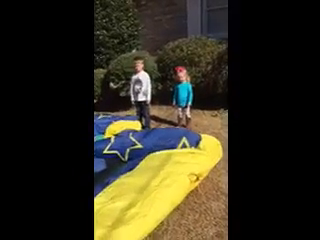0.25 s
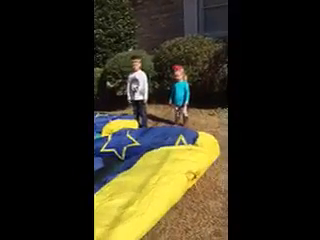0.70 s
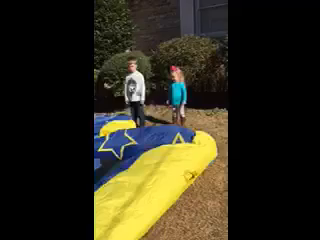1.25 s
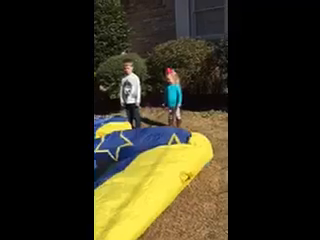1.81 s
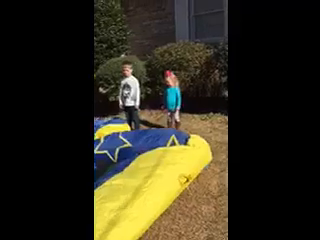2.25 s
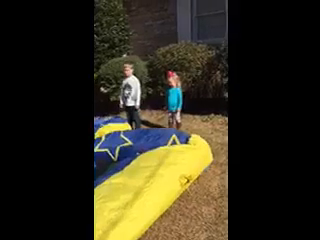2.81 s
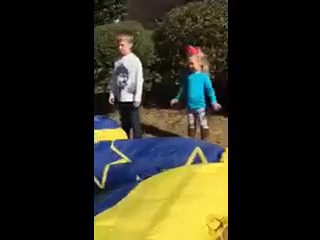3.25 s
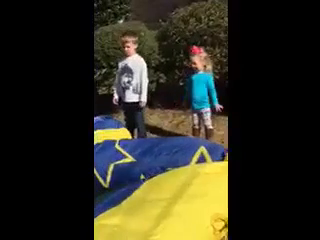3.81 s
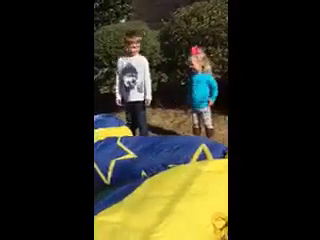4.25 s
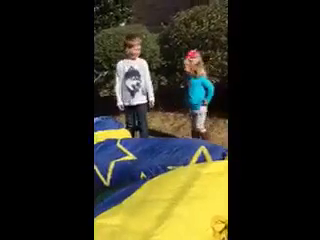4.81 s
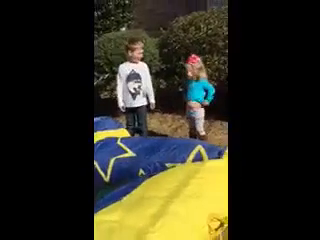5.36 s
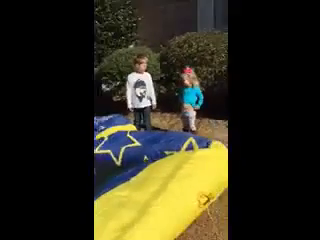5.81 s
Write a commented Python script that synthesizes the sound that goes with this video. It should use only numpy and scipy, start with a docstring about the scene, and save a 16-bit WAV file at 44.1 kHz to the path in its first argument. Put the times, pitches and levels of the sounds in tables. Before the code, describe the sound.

An electric blower runs steadily outdoors, filling a large inflatable with a low roar, rushing air and a thin whine.

```python
"""A steady roar of air on a lawn: an electric blower fills a large inflatable, a few metres from a phone.
Turbulent air rumbles in the fill tube and rushes through the fan, surging as eddies meet the impeller.
The blades add a thin whine that sinks slightly in pitch;
its partials swell and fade as the listener moves."""
import sys
import numpy as np
from scipy import signal
from scipy.fft import rfft, irfft, next_fast_len
from scipy.io import wavfile
from scipy.ndimage import uniform_filter1d, map_coordinates

SR = 44100
rng = np.random.default_rng(int(sys.argv[2]) if len(sys.argv) > 2 else 0)


def unload_audio(sound):
    """Save the sound as a 16-bit wav file, at the path given as the first command line argument."""
    columns = np.transpose(np.atleast_2d(sound))
    # keep every value between -1 and 1, then stretch to whole-number steps
    steps = np.round(np.clip(columns, -1, 1) * 32767)
    wavfile.write(sys.argv[1], SR, steps.astype(np.int16))


N = 267246

# the impeller slowing slightly: (time [s], blade passing rate [Hz])
BLADE_RATE = [(0, 325.8), (1, 325.0), (2.4, 323.6), (4, 322.85), (6.06, 322.8)]
# blade tones whose levels change over time at the microphone: (time [s], 2nd harmonic [dB], 4th [dB], 6th [dB])
CHANGING_TONES = [(0, -44, -51, -51), (.55, -50.5, -57, -47), (.95, -57, -54.5, -51.5),
                  (1.8, -53, -46.5, -43.5), (2.6, -58, -49.5, -46.5), (3.55, -51.5, -49, -49.5),
                  (4.0, -51.5, -49, -45.5), (4.75, -53, -42.5, -45.5), (5.2, -52.5, -50, -53),
                  (6.06, -46.5, -46, -49)]
# further blade tones, each at a steady level: (harmonic number, level [dB])
STEADY_TONES = [(1, -49.5), (3, -58), (8, -69)]
# air in the fill tube: (frequency [Hz], relative level [dB])
TUBE_SPECTRUM = [(8, -37), (24, -14), (50, -10.5), (85, -8), (125, -2), (185, 0), (225, -1.5), (290, -9),
                 (600, -72)]
# the hollow of the fan housing: (frequency [Hz], relative level [dB])
HOUSING_SPECTRUM = [(130, -31.5), (225, -4.5), (285, 3.5), (335, 3.5), (390, -1), (450, -6), (900, -72)]
# air leaving the outlet: (frequency [Hz], relative level [dB])
OUTLET_SPECTRUM = [(250, -31), (440, -4.5), (545, 2.5), (590, 0.5), (650, 1), (790, -4.5), (950, -1.5),
                   (1080, -5), (1400, -3.5), (1700, -13), (3000, -64.5)]
# air between the impeller blades: (frequency [Hz], relative level [dB])
IMPELLER_SPECTRUM = [(1100, -47.5), (1540, -5.5), (1680, 4), (1800, 4), (1950, 3), (2060, -11), (2500, -60)]
# air through the intake grille: (frequency [Hz], relative level [dB])
INTAKE_SPECTRUM = [(800, -34), (1500, -3.5), (2120, 0), (2400, -4), (2600, -4), (2950, -10.5),
                   (3300, -15.5), (3900, -31), (4300, -38), (5300, -53), (7000, -85)]
# the thin hiss on top: (frequency [Hz], relative level [dB])
HISS_SPECTRUM = [(3000, -10), (4500, 1), (5300, -1.5), (6200, .5), (6900, -3.5), (7400, -13)]
# swells (+) and lulls (-) of the low roar: (centre time [s], length [s], level change [dB])
ROAR_SWELLS = [(0.213, 0.17, 1.5), (0.587, .25, -3), (1.11, 0.077, 3.5), (1.936, 0.11, -4.5),
               (2.76, 0.26, 2.5), (3.19, 0.14, -5), (3.54, 0.13, 1.5), (4.032, 0.27, -3.5), (4.37, 0.11, 4),
               (5.22, 0.21, 4.3)]
# whooshes at the outlet: (centre time [s], length [s], level change [dB])
OUTLET_WHOOSHES = [(.3, 0.13, 1), (2.04, 0.085, 0.5), (2.72, 0.083, 2), (3.22, 0.084, 1), (4.05, 0.1, 2.5),
                   (4.8, 0.38, 1.5), (5.15, 0.043, 5)]

# base level of each part of the air path at the microphone
TUBE_DB, HOUSING_DB, OUTLET_DB, IMPELLER_DB, INTAKE_DB, HISS_DB = -40, -37.5, -37, -38.5, -40, -78.5


def amp(db):
    """Decibels to gain."""
    return 10 ** (np.asarray(db) / 20)


def unit(x):
    """x at rms 1."""
    return x / np.sqrt(np.mean(x ** 2) + 1e-20)


def along(points, hz):
    """(frequency, value) points read on a log axis."""
    f, v = np.transpose(points)
    return np.interp(np.log(hz + 1), np.log(f + 1), v)


def curves(rows):
    """One value per sample for each column after the time."""
    times, *columns = np.transpose(rows)
    return [np.interp(np.arange(N) / SR, times, column) for column in columns]


def wobble(rate):
    """A smooth random curve, rate knots a second."""
    return map_coordinates(rng.standard_normal(size=2048), [np.arange(N) * rate / SR], mode="wrap")


def swells(rows):
    """Level change in dB, one smooth bell a row."""
    t = np.arange(N) / SR
    return sum(db * np.exp(-(2 * (t - centre) / length) ** 2) for centre, length, db in rows)


def filtered(x, response):
    """x shaped by a gain that depends on frequency."""
    size = next_fast_len(N + SR // 2)
    return irfft(rfft(x, size) * response(np.fft.rfftfreq(size, 1 / SR)), size)[:N]


def turbulence(spectrum, eddy_db, eddy_hz, eddy_s):
    """Noise of rms 1 in which eddies lift and drop patches eddy_hz wide and eddy_s long."""
    hz, t, patches = signal.stft(rng.standard_normal(N), SR, nperseg=512)
    blur = lambda axis, width: np.exp(-2 * ((axis[:, None] - axis) / width) ** 2)
    eddies = unit(blur(hz, eddy_hz) @ rng.standard_normal(patches.shape) @ blur(t, eddy_s))
    air = signal.istft(patches * amp(eddy_db * eddies), SR, nperseg=512)[1][:N]
    air = filtered(air, lambda f: amp(along(spectrum, f)))
    # eddies are brief: over longer spans the flow alone sets the power
    power = uniform_filter1d(uniform_filter1d(air ** 2, size=SR // 5), size=SR // 8)
    return air / np.sqrt(np.abs(power) + 1e-20)


def tube_rumble():
    """Turbulent air rumbles in the fill tube, with swells and lulls."""
    level_db = TUBE_DB + swells(ROAR_SWELLS) + 0.67 * wobble(rate=18)
    return amp(level_db) * turbulence(TUBE_SPECTRUM, eddy_db=2.5, eddy_hz=120, eddy_s=0.029)


def housing_drone(swell_share=0.9):
    """The hollow fan housing drones, swelling along with the tube."""
    level_db = HOUSING_DB + swell_share * swells(ROAR_SWELLS) + wobble(rate=20)
    return amp(level_db) * turbulence(HOUSING_SPECTRUM, eddy_db=2.8, eddy_hz=90, eddy_s=0.034)


def outlet_rush(rise_from_s=5, rise_db_per_s=1.5):
    """Air whooshes from the outlet and grows louder towards the end."""
    rise_db = rise_db_per_s * np.maximum(np.arange(N) / SR - rise_from_s, 0)
    level_db = OUTLET_DB + rise_db + swells(OUTLET_WHOOSHES)
    return amp(level_db) * turbulence(OUTLET_SPECTRUM, eddy_db=2.0, eddy_hz=260, eddy_s=0.022)


def impeller_whistle(follow_share=0.28):
    """Air whistles between the blades, partly following the level of the 6th harmonic in its band."""
    sixth_db = curves(CHANGING_TONES)[-1]
    level_db = IMPELLER_DB + follow_share * (sixth_db - sixth_db.mean()) + 0.4 * wobble(rate=14)
    return amp(level_db) * turbulence(IMPELLER_SPECTRUM, eddy_db=4.0, eddy_hz=170, eddy_s=0.018)


def intake_rush():
    """Air drawn through the intake grille makes a bright rush."""
    return amp(INTAKE_DB) * turbulence(INTAKE_SPECTRUM, eddy_db=2.5, eddy_hz=325, eddy_s=0.016)


def air_hiss():
    """A thin hiss of moving air lies above the roar."""
    return amp(HISS_DB) * turbulence(HISS_SPECTRUM, eddy_db=1.9, eddy_hz=1200, eddy_s=0.03)


def blade_whine(flutter_db=5.1, jitter_rad=0.67):
    """The passing blades sound clean harmonics; unsteady air makes each one flutter on its own."""
    phase = 2 * np.pi * np.cumsum(curves(BLADE_RATE)[0]) / SR
    changing = zip((2, 4, 6), curves(CHANGING_TONES))
    whine = np.zeros(N)
    for harmonic, level_db in [*changing, *STEADY_TONES]:
        flutter = amp(flutter_db * wobble(rate=22))
        tone = np.sin(harmonic * phase + jitter_rad * wobble(rate=24))
        whine += amp(level_db) * unit(flutter * tone)
    return whine


def scene(surge_db=0.64, shudder_db=0.74):
    """The blower on the lawn, heard at one microphone a few metres off."""
    low_roar = tube_rumble() + housing_drone()
    rush = outlet_rush() + impeller_whistle() + intake_rush() + air_hiss()
    # uneven inflow shakes the rushing layers together
    shake = amp(surge_db * wobble(rate=36) + shudder_db * wobble(rate=260))
    return (low_roar + shake * rush + blade_whine())[None]


def record(dry, top_hz=7400):
    """The phone keeps nothing above its band limit."""
    return np.array([filtered(channel, lambda hz: hz < top_hz) for channel in dry])


dry = scene()
out = record(dry)
unload_audio(out)
```